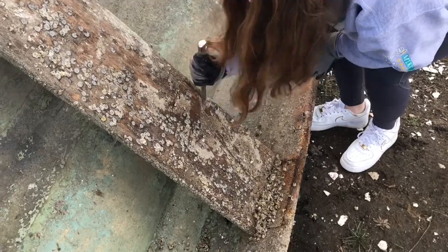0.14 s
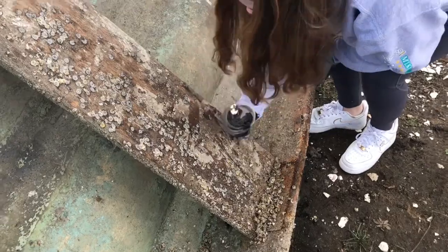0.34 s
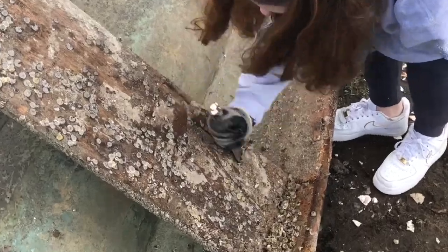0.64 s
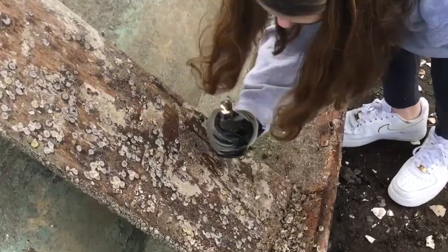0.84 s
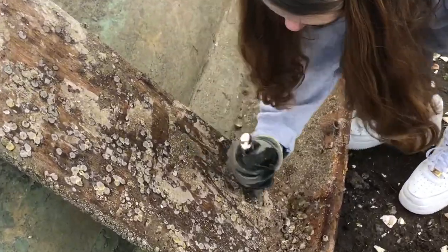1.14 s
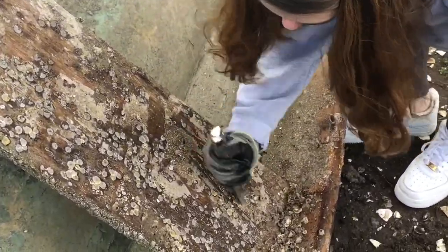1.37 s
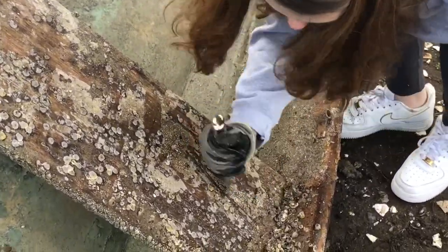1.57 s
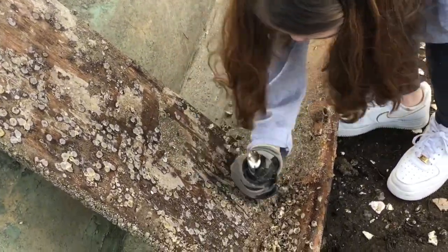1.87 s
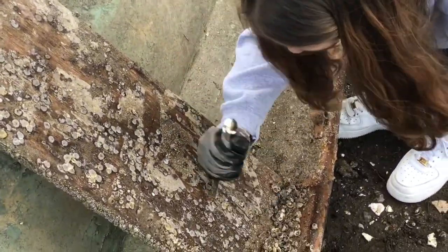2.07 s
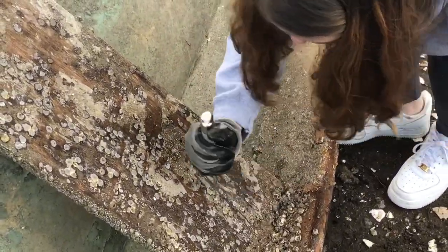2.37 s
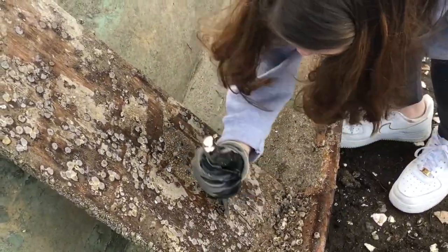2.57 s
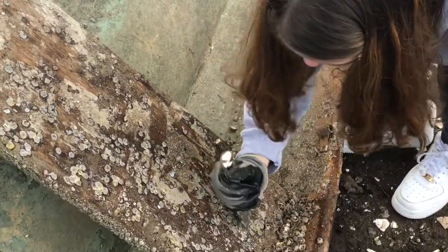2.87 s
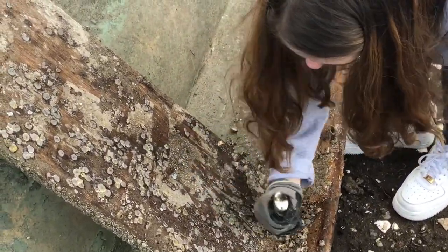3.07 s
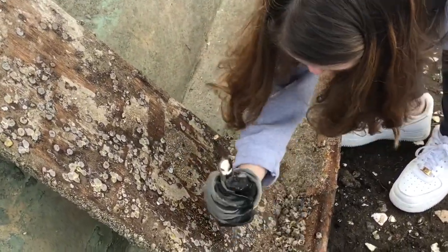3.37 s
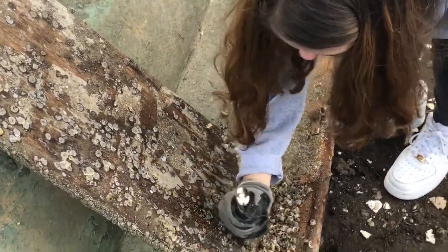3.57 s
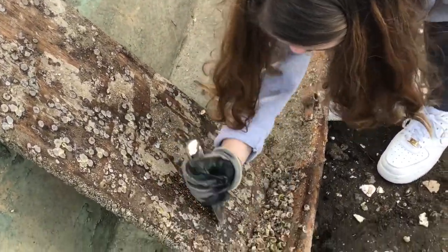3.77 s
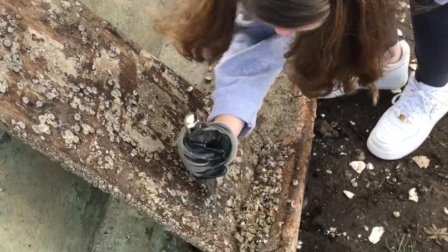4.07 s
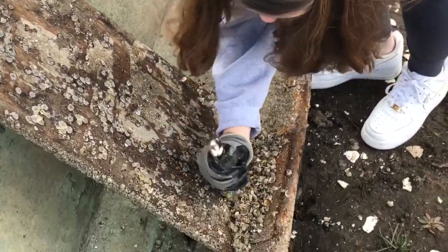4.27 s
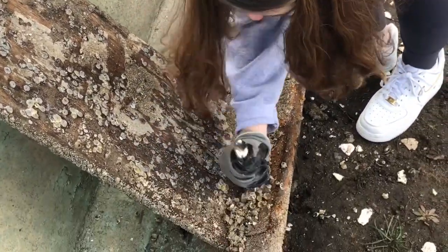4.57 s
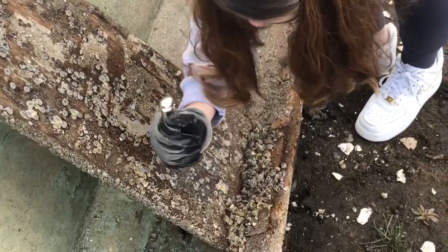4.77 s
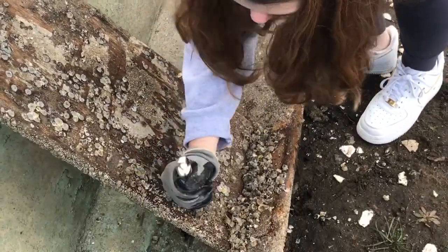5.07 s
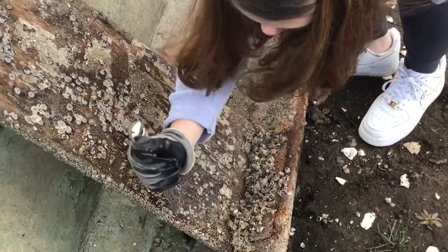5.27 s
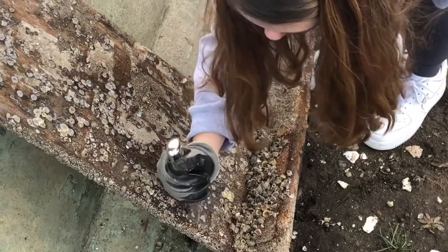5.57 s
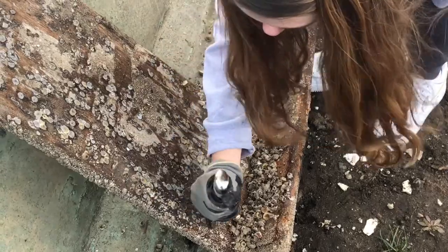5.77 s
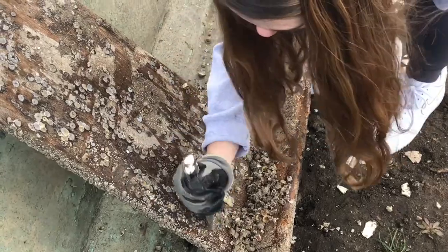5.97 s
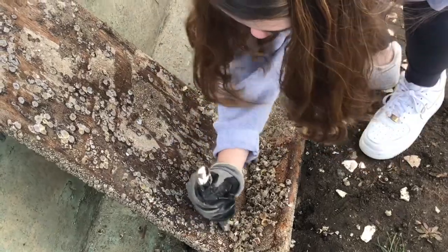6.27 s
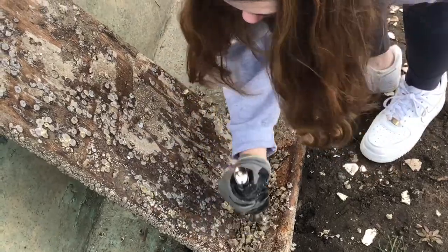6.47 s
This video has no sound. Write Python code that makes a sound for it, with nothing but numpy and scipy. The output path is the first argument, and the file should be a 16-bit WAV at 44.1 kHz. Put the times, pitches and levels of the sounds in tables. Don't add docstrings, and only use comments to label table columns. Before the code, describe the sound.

Close, dry outdoor scraping over a low, lumpy wind rumble. Light scratches at 0.05 and 0.13 s lead to a hard crunch at 0.25 s, then a faint brush and gritty drags near 0.65, 1.0, 1.4, 1.75 and, more softly, 2.15 s. Shells crack brightly, the fibreglass rings in short hollow knocks, and fine grit trickles after. From 2.65 s the strokes become shorter, sharper jabs, near 3.05, 3.45, 3.85, 4.18, 4.5, 5.0, 5.38, 5.7, 6.05 and 6.33 s; the one at 4.5 s gives the heaviest hull thump. Small shell ticks fall between. Wind pops strike the microphone hardest at 1.2, 2.6 and 4.8 s. Distant soft coos repeat from 1.6 to 3 s; thin whistles appear from 4.1 s, faint trills around 5.1 to 5.6 s, and falling chirps at 5.6, 5.9 and 6.1 s.

```python
import sys
import numpy as np
from scipy import signal
from scipy.fft import rfft, irfft, next_fast_len
from scipy.io import wavfile

SR = 44100
rng = np.random.default_rng(int(sys.argv[2]) if len(sys.argv) > 2 else 0)


def inscribe(sig):
    pcm = np.round(np.clip(np.atleast_2d(sig).T, -1, 1) * 32767)
    wavfile.write(sys.argv[1], SR, pcm.astype(np.int16))


def invert_db(level):
    return 10 ** (np.asarray(level, dtype=float) / 20)


N = 292812

# (start [s], end [s], grind at start [dB], grind at end [dB], shell brightness above 6 kHz [dB])
STROKE_ROWS = [(0.057, 0.09, -29.5, -53, -1), (0.132, 0.134, -30.5, -43, 11),
               (0.226, 0.315, -24.5, -29, -9), (0.466, 0.51, -42, -59, 2.5), (0.59, 0.726, -34.5, -31, -1),
               (0.975, 1.079, -30.5, -30, 3), (1.328, 1.451, -42, -21.5, 1),
               (1.701, 1.8, -34.5, -24.5, 0.5), (2.098, 2.225, -54.5, -35, -1), (2.627, 2.705, -30, -27, 2),
               (3.021, 3.079, -30, -12.5, -4.5), (3.451, 3.493, -39.5, -19.5, 1),
               (3.843, 3.868, -12, -27.5, -1), (4.164, 4.19, -25, -18.5, -1),
               (4.487, 4.528, -20.5, -18.5, 0), (4.986, 5.023, -32, -16.5, 4.5),
               (5.363, 5.382, -29, -19.5, 7), (5.695, 5.713, -26.5, -33.5, 3.5),
               (6.034, 6.076, -18.5, -39, 7.5), (6.311, 6.333, -39.5, -12, -3.5)]
# (pitch [Hz], width [Hz], level [dB])
SEAT_MODES = [(859.6, 20, -3.5), (940, 59, -6), (1046, 34, -0.5), (1153.5, 23, -7), (1250, 56, 3),
              (1459, 28, -7), (1588, 60, 0), (2283, 110, -6.5)]
# (pitch [Hz], width [Hz], level [dB])
HULL_MODES = [(199, 10, 2), (208, 15, -1.5), (289, 32, 2.5), (400, 15, 0), (518, 65, -15), (657, 83, -13),
              (693, 50, -4)]


def rms_one(x):
    return x / np.sqrt(np.mean(x ** 2) + 1e-20)


def in_time(rows):
    s, *columns = np.transpose(rows)
    return np.array([np.interp(np.arange(N) / SR, s, c) for c in columns])


def sieve(x, order, hz, kind):
    return signal.sosfilt(signal.butter(order, hz, kind, fs=SR, output="sos"), x)


def colour(x, spectrum):
    size = next_fast_len(N + SR // 4)
    hz, db = np.transpose(spectrum)
    bins_hz = np.arange(8193) * SR / 16384
    log_gain = np.interp(np.log(bins_hz + 1), np.log(hz), db) * np.log(10) / 20
    cepstrum = irfft(log_gain)
    cepstrum[1:8192] *= 2
    cepstrum[8193:] = 0
    response = irfft(np.exp(rfft(cepstrum)))
    return irfft(rfft(x, size) * rfft(response, size), size)[:N]


def drift(rate):
    r = np.exp(-80 * np.pi * rate / SR)
    noise = rng.standard_normal(N // 40 + 2002)
    slow = signal.lfilter([1], [1, -2 * r, r * r], noise)[2000:]
    return np.interp(np.arange(N) / 40, np.arange(len(slow)), rms_one(slow))


def resonate(x, hz, width_hz):
    r = np.exp(-np.pi * width_hz / SR)
    ring = signal.lfilter([1, 0, -1], [1, -2 * r * np.cos(2 * np.pi * hz / SR), r * r], x)
    return ring * np.sqrt((1 - r * r) / 2)


def grit(per_s, spread_db):
    sizes = invert_db(spread_db * np.minimum(rng.exponential(1, N), 4)) * rng.choice([-1, 1], N)
    return rms_one(sizes * (rng.random(N) < per_s / SR)) + 1e-18


def burst(s, t60):
    at = round(s * SR)
    age = np.arange(min(SR // 8, N - at)) / SR
    fall = invert_db(-60 * age / max(t60, .003)) * np.minimum(age / 0.0011, 1)
    return slice(at, at + len(age)), fall


def far_air():
    # (frequency [Hz], level [dB])
    air_tone = [(150, -30.5), (250, -10), (400, -15.5), (522, -18.5), (1250, -21.5), (2050, -31.5),
                (4280, -40), (15100, -45.5), (16500, -50)]
    return invert_db(-58 + 0.5 * drift(7.2)) * rms_one(colour(rng.standard_normal(N), air_tone))


def birds():
    # (time [s], length [s], level [dB])
    coos = [
        (1.58, .11, -49),
        (1.88, .11, -48),
        (2.21, .11, -49),
        (2.54, .12, -49),
        (2.885, .11, -49),
    ]
    # (start [Hz], middle [Hz], end [Hz])
    coo_hz = (1100, 1450, 1050)
    # (time [s], length [s], level [dB])
    chirps = [
        (5.615, .065, -44),
        (5.862, .055, -45),
        (6.112, .06, -46),
    ]
    # (start [Hz], middle [Hz], end [Hz])
    chirp_hz = (4500, 3820, 3050)
    # (time [s], length [s], pitch [Hz], level [dB])
    whistles = [
        (4.065, .09, 3902, -45),
        (4.22, .11, 7230, -62),
        (4.33, .115, 7250, -55),
        (4.75, .05, 7100, -62),
        (4.79, .16, 7150, -58),
        (5.96, .06, 9900, -66),
        (5.96, .05, 6700, -64),
        (6.22, .05, 6700, -65),
        (5.3, .05, 5780, -49),
    ]
    # (start [s], end [s], pitch [Hz], level [dB])
    trills = [
        (5.08, 5.32, 4250, -70),
        (5.1, 5.3, 4600, -71),
        (5.12, 5.24, 4950, -71),
        (5.42, 5.62, 4300, -71),
        (5.42, 5.58, 4650, -72),
        (5.43, 5.55, 4950, -73),
        (5.44, 5.52, 5600, -73),
    ]
    notes = [(*row, *coo_hz) for row in coos] + [(*row, *chirp_hz) for row in chirps]
    notes += [(s, length, db, hz, hz, hz) for s, length, hz, db in whistles]
    out = np.zeros(N)
    for s, length, db, start_hz, middle_hz, end_hz in notes:
        u = np.linspace(-1, 1, round(length * SR))
        bend = (start_hz + end_hz) / 2 - middle_hz
        hz = middle_hz + (end_hz - start_hz) / 2 * u + bend * u ** 2
        tone = np.sin(2 * np.pi * np.cumsum(hz) / SR)
        at = round(s * SR)
        out[at:at + len(u)] += invert_db(db - 8) * np.sqrt(1 - u ** 4) * tone
    for start, end, hz, db in trills:
        swell = np.interp(np.arange(N) / SR, [start, start + .03, end - .05, end], [0, 1, 1, 0])
        flutter = resonate(resonate(rng.standard_normal(N), hz, 240), hz, 240)
        out += swell * invert_db(db + 5.5) * rms_one(flutter)
    out = out * invert_db(2.2 * drift(30) - .5)
    age = np.arange(SR // 5) / SR
    echoes = rng.standard_normal(len(age)) * invert_db(-29 - 60 * age / .14)
    return out * invert_db(-13.5) + signal.fftconvolve(out, echoes)[:N]


def wind_pops(pops):
    out, puffs = np.zeros(N), np.zeros(N)
    for (s, db, cycles), side in zip(pops, rng.choice([-1, 1], (len(pops), 1))):
        at = round(s * SR)
        turns = np.arange(min(SR // 20, N - at)) / SR * 206 - .9
        rise = np.minimum((turns + .9) / .4, 1) ** 2
        fade = np.exp(-np.abs(turns / max(cycles, .1)) ** 1.75)
        out[at:at + len(turns)] += side * invert_db(db + 3) * np.sin(2 * np.pi * turns) * rise * fade
        span, fall = burst(s, t60=.08)
        puffs[span] += invert_db(db - 20) * fall
    ragged = sieve(rng.standard_normal(N), 2, [130, 480], "band")
    return out + puffs * rms_one(ragged)


def wind():
    # (time [s], level [dB])
    gusts = [(0, -23), (0.35, -23.5), (0.8, -30.5), (1.22, -23), (1.6, -24), (2.05, -28.5), (2.55, -24.5),
             (2.73, -38), (3.2, -28), (3.85, -25.5), (4.25, -29.5), (4.8, -25.5), (5.1, -36), (5.9, -38),
             (6.25, -29.5), (6.64, -28)]
    # (frequency [Hz], level [dB per Hz])
    rumble_tone = [(8.8, -55), (15, -19), (51, 7.5), (70, 6.5), (135, 2), (193, -8.5), (225, -14.5),
                   (300, -39), (390, -39), (660, -120)]
    # (time [s], peak level [dB], width [cycles])
    pops = [(0.068, -21, 0.98), (0.147, -20.5, 0.088), (0.533, -21.5, 0.91), (1.071, -18, 0.68),
            (1.185, -7, 0.25), (1.42, -19.5, 0.66), (1.449, -29, 0.61), (1.554, -32, .4),
            (1.331, -16, 0.22), (1.651, -26, 0.18), (2.029, -23, 0.31), (2.207, -17, 0.21),
            (2.26, -17, 0.46), (2.304, -14, 0.48), (2.415, -13, 0.28), (2.424, -23, 0.11),
            (2.494, -17.5, 0.22), (2.543, -21, 0.14), (2.592, -5, 0.5), (3.246, -27, 0.77),
            (3.288, -30.5, 0.73), (3.32, -34, .4), (3.581, -24.5, 0.45), (4.616, -20, 0.46),
            (4.719, -20.5, 0.61), (4.765, -22, 0.36), (4.864, -27, 0.72), (6.27, -20, 1),
            (3.334, -23.5, 0.86), (3.654, -30.5, 0.24), (3.719, -21.5, 0.82), (4.101, -20, 0.57),
            (4.701, -24, 0.29), (4.748, -39, 0.35), (4.797, -9.5, 0.51), (4.84, -21.5, 0.47),
            (5.294, -31, 1), (6.246, -24, 0.91), (6.52, -33, 0.29)]
    # (time [s], change [dB], half width [s])
    lulls = [(0.45, -12, 0.093), (0.878, -20, 0.027), (1.419, -14, 0.053), (1.97, -8.5, 0.059),
             (2.159, -8, 0.041), (2.378, -17.5, 0.043), (2.899, -10.5, 0.087), (3.42, -7.5, 0.046),
             (3.7, -13.5, 0.017), (4.038, -15, 0.033), (4.15, -12.5, 0.016), (4.401, -14.5, 0.13),
             (5.25, -11, 0.054), (5.651, -4, 0.046), (6.101, 3.5, 0.027)]
    t = np.arange(N) / SR
    swells = sum(invert_db(db - 15.5) ** 2 * np.exp(-((t - s - 0.0075) / 0.065) ** 2) for s, db, _ in pops)
    rumble_db = 10 * np.log10(invert_db(in_time(gusts)[0]) ** 2 + swells)
    rumble_db = rumble_db + sum(db * np.exp(-((t - s) / width) ** 2) for s, db, width in lulls)
    rumble = rms_one(colour(rng.standard_normal(N), rumble_tone)) * invert_db(rumble_db + 2.9 * drift(11))
    eddies = sieve(grit(150, 3.1), 4, [120, 310], "band")
    flutter = rms_one(eddies) * invert_db(rumble_db - 14.5 + 5.2 * drift(6.9))
    return rumble + flutter + wind_pops(pops)


def contact():
    # (time [s], peak level [dB], favoured mode [Hz])
    knocks = [(0.06, -36, 1660), (0.217, -9.5, 1240), (0.259, 3.7, 960), (0.316, -4, 940),
              (0.684, -6, 1250), (0.962, -12.5, 1100), (1.022, -8, 1220), (1.364, -12.5, 1100),
              (1.74, -3.5, 1130), (1.776, -5.5, 1250), (1.82, -7.5, 1296), (2.062, -24.5, 1030),
              (2.184, -18, 1490), (2.671, -10.5, 1310), (2.7, -9, 1470), (3.061, -1, 1257),
              (3.069, -18, 1270), (3.086, -2, 902), (3.451, -9.5, 1250), (3.483, -12, 1250),
              (3.851, -7, 1000), (3.863, -1.5, 1150), (4.187, -22.5, 1223), (4.497, -6, 1190),
              (5.015, 2.5, 1594), (5.385, -6.5, 1662), (6.04, -12, 1500), (6.063, -15.5, 1240),
              (6.337, 2.5, 1193)]
    # (time [s], peak level [dB], favoured mode [Hz], push t60 [s])
    thuds = [(0.229, -16, 199, 0.091), (0.315, -8, 245, 0.029), (0.687, -12, 215, 0.027),
             (1.803, -19, 225, 0.077), (1.824, -8, 222, 0.038), (2.634, -22, 188, 0.018),
             (2.702, -15.5, 189, 0.031), (3.068, -17, 183, 0.22), (3.449, -10, 270, 0.036),
             (3.497, -19.5, 202, 0.15), (3.863, -20, 201, 0.056), (4.183, -19, 212, 0.19),
             (4.5, -23, 190, 0.03), (4.521, 11, 540, 0.052), (4.527, -14, 400, 0.15),
             (5.018, -6.5, 257, 0.029), (5.03, -13.5, 263, 0.17), (5.302, -35, 262, 0.36),
             (5.379, -18, 249, 0.2), (5.698, -15.5, 243, 0.089), (5.722, -20.5, 250, 0.19),
             (6.052, -11, 189.5, 0.032), (6.066, -15.5, 206, 0.1), (6.339, -5.5, 199, 0.055)]
    # (time [s], peak level [dB], crumble t60 [s])
    crack_offs = [(0.2516, -4, 0.047), (0.259, 3, 0.066), (0.3115, -9, 0.019), (0.6394, -3.5, 0.063),
                  (0.6813, 0.5, 0.059), (0.9737, -4.5, 0.023), (1.0174, -6, 0.057), (1.032, -11, 0.13),
                  (1.058, -9.5, 0.074), (1.3643, -7, 0.072), (1.429, -12.5, 0.15), (1.737, -9.5, 0.055),
                  (1.7763, -4.5, 0.046), (1.788, -3, 0.13), (1.8191, 7.5, 0.02), (2.181, -19, 0.023),
                  (2.666, 1, 0.043), (2.675, 1, 0.032), (2.6978, 3.5, 0.017), (3.04, -13, 0.046),
                  (3.056, 0.5, 0.085), (3.478, -5, 0.086), (4.173, -6, 0.046), (4.183, 10.5, 0.018),
                  (4.4939, 4.5, 0.018), (4.515, 7, 0.02), (4.999, -5, 0.068), (5.011, -3, 0.017),
                  (5.3814, -1.5, 0.063), (5.7152, -6, 0.039), (6.06, -3.5, 0.025), (6.33, -10, 0.0092)]
    # (time [s], peak level [dB], crumble t60 [s])
    ticks = [(0.0342, -16.5, 0.0069), (0.0627, -15.5, 0.083), (0.179, -27, 0.034), (0.427, -21, 0.047),
             (0.7635, -32, 0.06), (0.899, -23.5, 0.029), (1.0928, -10, 0.022), (1.205, -26, 0.025),
             (1.5376, -28.5, 0.1), (1.8882, -16, 0.036), (1.937, -26, 0.062), (2.056, -37, 0.15),
             (2.2924, -9.5, 0.041), (2.741, -21.5, .02), (2.758, -30, 0.029), (2.832, -29.5, 0.097),
             (2.844, -25.5, 0.048), (3.547, -31, .02), (3.59, -32, 0.069), (3.602, -29, 0.064),
             (3.831, -17, 0.1), (3.906, -17.5, 0.033), (4.27, -30, 0.16), (4.299, -28, 0.077),
             (4.58, -29, 0.11), (4.724, -27.5, 0.052), (4.7692, -38.5, 0.037), (5.085, -32, 0.022),
             (5.1262, -30.5, 0.096), (5.435, -21, 0.015), (5.802, -37, 0.073), (5.824, -32, 0.084),
             (6.423, -32, 0.24), (6.45, -25, 0.08), (6.602, -28, 0.14)]
    t = np.arange(N) / SR
    edge, debris = np.zeros(N), np.zeros(N)
    seat, hull = np.zeros((len(SEAT_MODES), N)), np.zeros((len(HULL_MODES), N))
    for start, end, start_db, end_db, _ in STROKE_ROWS:
        span = slice(round(start * SR), round((end + .25) * SR))
        after = np.maximum(t[span] - end, 0)
        bite = np.clip((t[span] - start) / 0.00096, 0, 1)
        grind_db = np.interp(t[span], [start, end], [start_db, end_db])
        grind = bite * invert_db(grind_db - 60 * after / .055)
        edge[span] += grind ** 2
        seat[:, span] += (grind * invert_db(4)) ** 2
        hull[:, span] += (grind * invert_db(-9)) ** 2
        fallen_db = -45 + 0.89 * ((start_db + end_db) / 2 + 22.0)
        debris[span] += (bite * invert_db(fallen_db - 60 * after / 0.41)) ** 2
    for rows, seat_db in (crack_offs, -15.5), (ticks, -17.5):
        for s, db, t60 in rows:
            span, fall = burst(s, t60)
            edge[span] += (invert_db(db - 9.5) * fall) ** 2
            seat[:, span] += (invert_db(db + seat_db) * fall) ** 2
    jolts = [(*row, 0.046) for row in knocks]
    for force, blows, modes in (seat, jolts, SEAT_MODES), (hull, thuds, HULL_MODES):
        for s, db, hz, t60 in blows:
            span, fall = burst(s, t60)
            octaves = np.log2(np.array(modes)[:, :1] / hz)
            force[:, span] += (invert_db(db + 3.5 - 30.4 * np.abs(octaves)) * fall) ** 2
    return np.sqrt(edge), np.sqrt(seat), np.sqrt(hull), np.sqrt(debris)


def body(forces, modes, wander_db):
    rings = np.zeros(N)
    for force, (hz, width, db) in zip(forces, modes):
        push = force * grit(5000, 2.2) * invert_db(db + wander_db * drift(5))
        rings += resonate(push, hz, max(width, 62))
    return rings / np.sqrt(np.sum(invert_db(np.array(modes)[:, 2]) ** 2))


def fragments(force):
    pitches = np.geomspace(1800, 15000, 18)
    dealt = rng.integers(0, 18, N // 160 + 1).repeat(160)[:N]
    rings = np.zeros(N)
    for k, hz in enumerate(pitches):
        rings += resonate(force * (dealt == k) + 1e-18, hz, hz / 7.7) * np.sqrt(hz / 6000)
    return rings


def breaking_shells(edge, debris):
    # (time [s], level [dB])
    trickle_level = [
        (0.0, -58),
        (1.02, -63.5),
        (3.86, -81.5),
        (4.07, -73.5),
        (6.64, -73),
    ]
    # (frequency [Hz], level [dB per Hz])
    shell_tone = [(410, -37.5), (700, -17.5), (758, -14.5), (936, -9), (1250, -5.5), (1990, -13.5),
                  (2210, -11.5), (2880, -13.5), (4170, -9.5), (5020, -17), (14300, -22.5), (15900, -22.5),
                  (16500, -55)]
    trickle = (invert_db(in_time(trickle_level)[0]) + debris) * invert_db(2.7 * drift(60) - 1.5) * grit(2800, 2.5)
    breaking = edge * invert_db(2.8 * drift(80) - 2.5) * grit(4500, 3.0) + trickle
    white_gain = np.std(colour(rng.standard_normal(N), shell_tone))
    crack = colour(invert_db(-5.0) * breaking + invert_db(-8.0) * fragments(breaking), shell_tone) / white_gain
    top = sieve(crack, 1, 6000, "high")
    brightness = in_time([(end, bright_db) for _, end, _, _, bright_db in STROKE_ROWS])[0]
    return crack + (invert_db(brightness) - 1) * top


def snaps():
    # (time [s], peak level [dB], ring [Hz], t60 [s])
    shell_snaps = [(0.2197, -22, 2450, 0.01), (0.2512, -3.5, 4370, 0.034), (0.2603, -10.5, 4270, 0.013),
                   (0.266, -7.5, 2300, 0.028), (0.307, -16.5, 4230, 0.026), (0.47, -27, 2870, 0.015),
                   (0.4843, -28, 2480, 0.022), (0.5074, -35, 3240, 0.017), (0.5346, -34, 2000, 0.019),
                   (0.5414, -53, 2130, 0.015), (0.5935, -28.5, 2200, 0.013), (0.6347, -14, 2190, 0.029),
                   (0.6444, -15, 3500, 0.016), (0.683, -4.5, 4640, 0.013), (0.937, -41, 2310, 0.017),
                   (0.97, -24, 3680, 0.015), (1.0037, -9, 2430, 0.015), (1.0228, -18, 2460, 0.015),
                   (1.0328, -11, 2460, 0.03), (1.06, -25.5, 1980, 0.01), (1.06, -14.5, 3380, 0.023),
                   (1.1516, -33, 2460, 0.018), (1.1783, -33, 6990, 0.02), (1.1924, -35.5, 2280, 0.026),
                   (1.269, -48.5, 2050, 0.011), (1.3144, -45, 3660, 0.0087), (1.3299, -53, 4250, 0.013),
                   (1.3685, -10, 8240, 0.03), (1.3714, -9, 4450, 0.015), (1.4127, -19, 2250, 0.015),
                   (1.4321, -13, 3600, 0.023), (1.4444, -3.5, 3620, 0.02), (1.456, -14, 4460, 0.025),
                   (1.702, -49, 4440, 0.005), (1.7235, -19.5, 2500, 0.02), (1.744, -9, 2500, 0.015),
                   (1.7889, -1.5, 3690, 0.03), (1.7963, -5, 4000, 0.037), (1.869, -23.5, 3750, 0.015),
                   (1.9264, -29, 3900, 0.015), (2.058, -46.5, 2170, 0.014), (2.0744, -34.5, 2420, 0.02),
                   (2.1011, -48, 2270, 0.015), (2.164, -26, 4800, 0.0099), (2.193, -34, 2940, 0.012),
                   (2.2066, -11, 7330, 0.0058), (2.2184, -20, 7200, 0.014), (2.233, -39, 3770, 0.015),
                   (2.247, -32, 2260, 0.015), (2.2777, -28, 4170, 0.028),
                   (2.6364, -8, 3850, 0.03), (2.6494, -12, 2390, 0.015), (2.6662, -7, 4250, 0.017),
                 (2.6792, -15, 4120, 0.011), (2.7881, -39.5, 3880, 0.034), (3.0247, -19.5, 2490, 0.015),
                 (3.042, -5.5, 4250, 0.021), (3.0596, -1.5, 2220, 0.024), (3.4481, -36.5, 1980, 0.015),
                 (3.448, -12.5, 2570, 0.021), (3.8342, -17, 4480, 0.027), (3.8433, -6, 4170, 0.022),
                 (3.8453, 2, 4090, 0.032), (3.8597, -5.5, 2230, 0.037), (4.1664, -22.5, 2960, 0.015),
                 (4.1754, -6.5, 4100, 0.026), (4.1818, 0, 2220, 0.023), (4.4939, -6.5, 1980, 0.017),
                 (4.5201, -2.5, 2270, 0.015), (4.7844, -48.5, 7200, 0.026), (4.8294, -51.5, 7170, 0.017),
                 (4.922, -46.5, 7140, 0.011), (4.993, -19, 4240, 0.018), (4.999, -10, 3400, 0.018),
                 (5.016, -2.5, 3940, 0.016), (5.243, -48, 4460, 0.021), (5.276, -43, 3030, 0.02),
                 (5.373, -11, 3910, 0.015), (5.3786, -9, 4460, 0.038), (5.458, -30, 4360, 0.016),
                 (5.5894, -55.5, 2440, 0.015), (5.697, -24, 3100, 0.011), (5.7038, -24, 3860, 0.013),
                 (5.7623, -36, 2450, 0.015), (6.0335, -11, 5570, 0.015), (6.0344, -8.5, 4160, 0.016),
                 (6.0494, -9, 3760, 0.015), (6.319, -14, 7800, 0.01), (6.327, -4.5, 3910, 0.022),
                 (6.3394, -21, 2370, 0.013)]
    rows = shell_snaps
    out = np.zeros(N)
    for (s, db, hz, t60), noise in zip(rows, rng.standard_normal((len(rows), SR // 8))):
        span, fall = burst(s - .001, t60)
        fracture = signal.lfilter([1, -.8], [1], fall * noise[:len(fall)])
        ring = np.sqrt(SR / hz) * resonate(fracture, hz, hz / 6.8)
        out[span] += invert_db(db - 14) * (fracture + invert_db(-2) * ring)
    return out


def scraper():
    edge, seat, hull, debris = contact()
    ring = invert_db(-3.5) * body(seat, SEAT_MODES, wander_db=-1.1)
    boom = invert_db(4.5) * body(hull, HULL_MODES, wander_db=-1.0)
    near = breaking_shells(edge, debris) + snaps()
    near = near + sieve(ring, 2, 720, "high") + sieve(boom, 2, 950, "low")
    age = np.arange(SR // 4) / SR
    echo = signal.lfilter([.3], [1, -.7], rng.standard_normal(len(age))) * invert_db(-49 - 60 * age / .2)
    return near + signal.fftconvolve(near, echo)[:N]


def scene():
    return (far_air() + birds() + wind() + scraper())[None]


def band_limit(x):
    return signal.sosfilt(signal.butter(12, 16780, fs=SR, output="sos"), x)


def record(dry):
    dry = sieve(dry, 3, 34, "high")
    rounded = 0.9 * np.tanh(dry / 1.027)
    top_cut = signal.cheby2(10, 60, 16900, fs=SR, output="sos")
    return band_limit(signal.sosfilt(top_cut, rounded))


dry = scene()
out = record(dry)
inscribe(out)
```